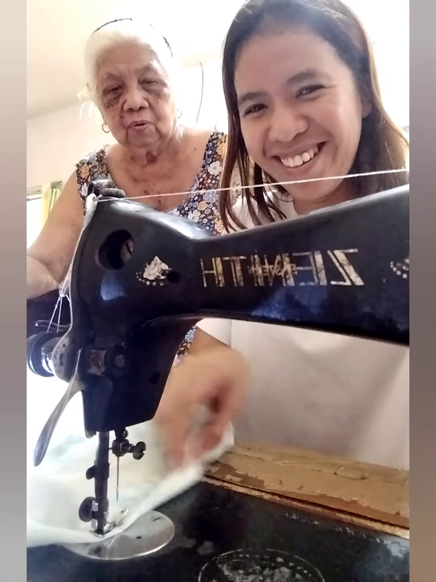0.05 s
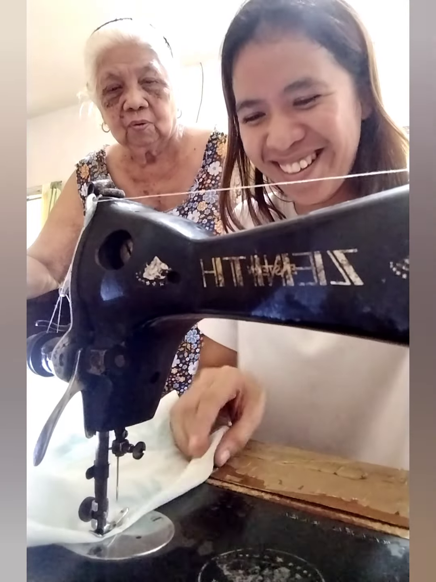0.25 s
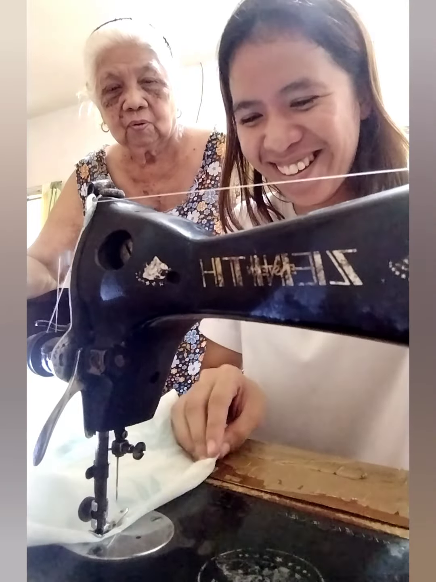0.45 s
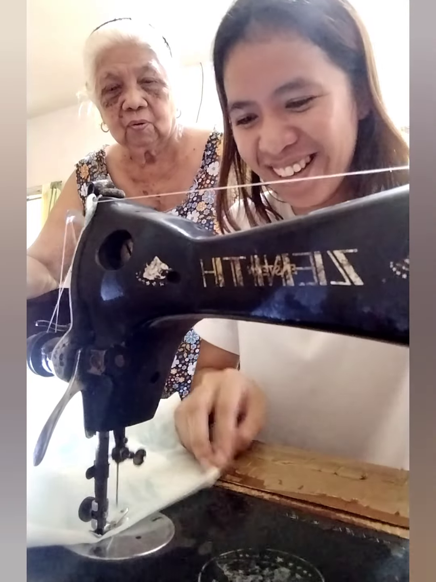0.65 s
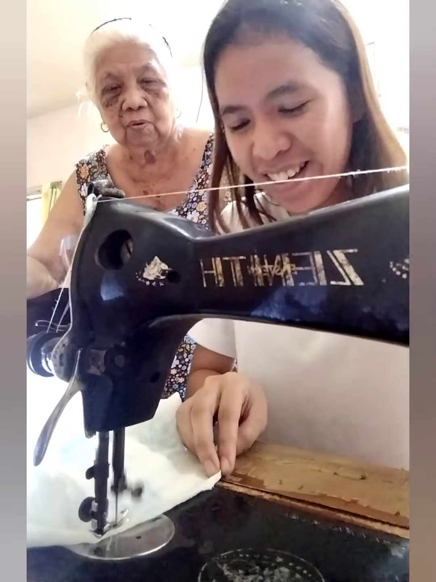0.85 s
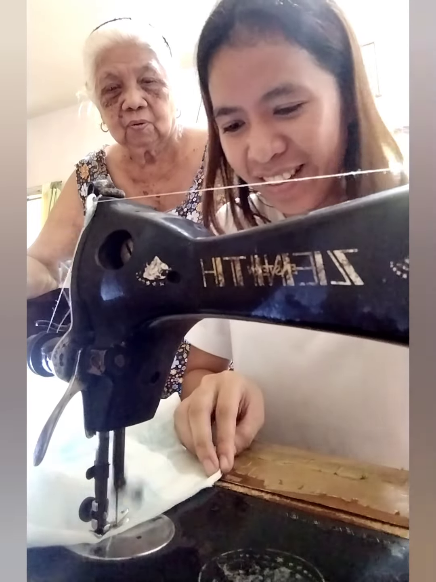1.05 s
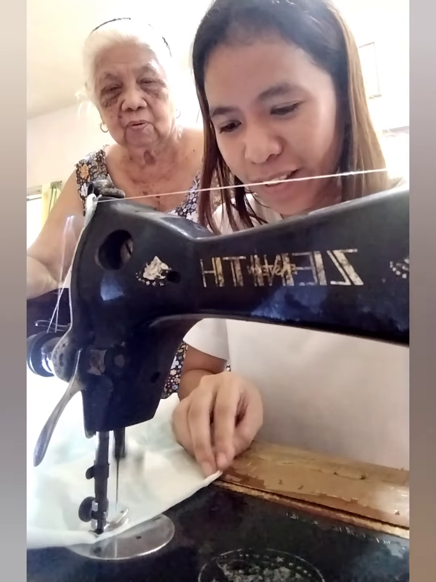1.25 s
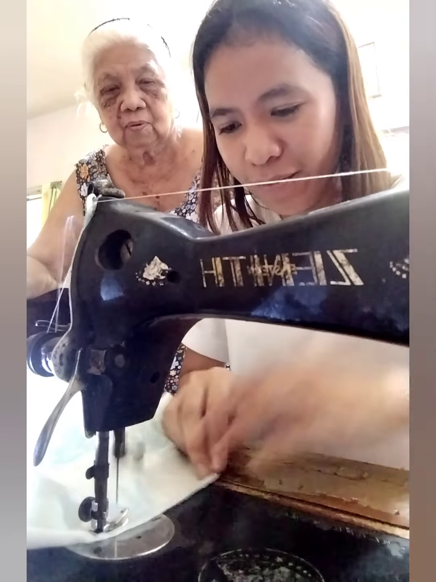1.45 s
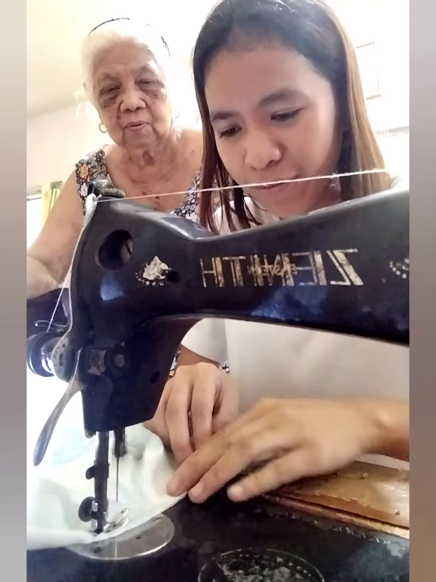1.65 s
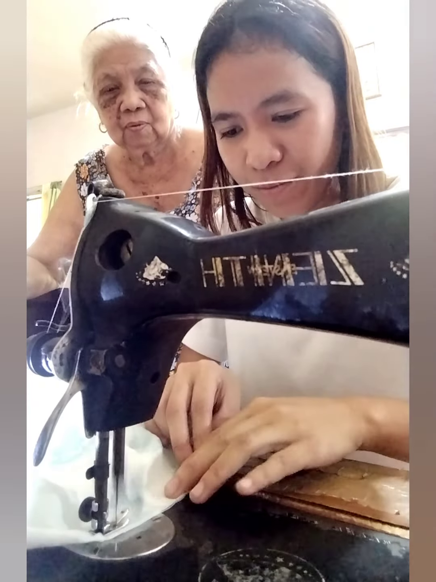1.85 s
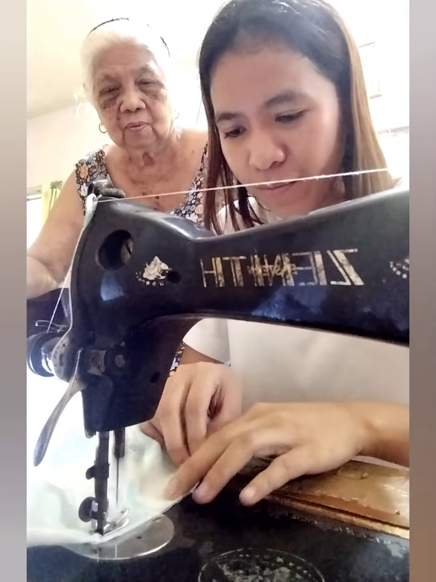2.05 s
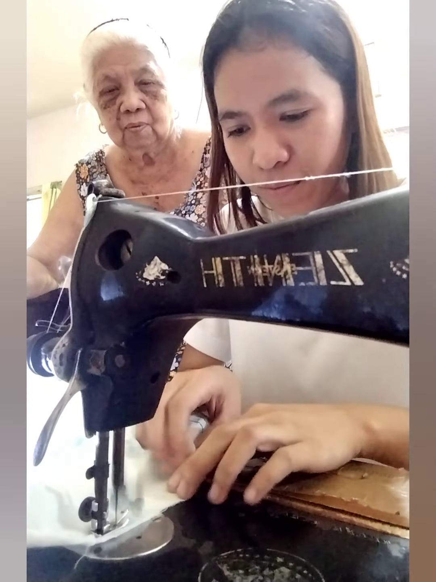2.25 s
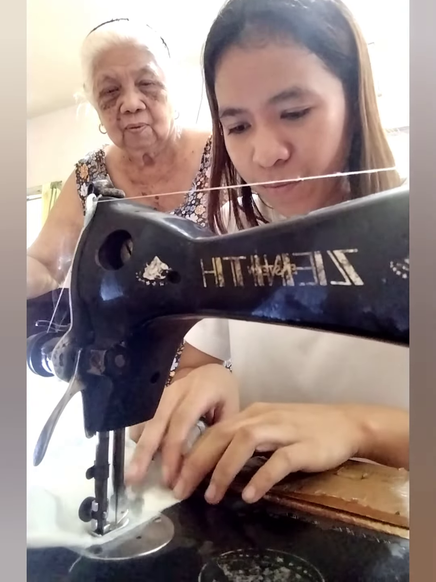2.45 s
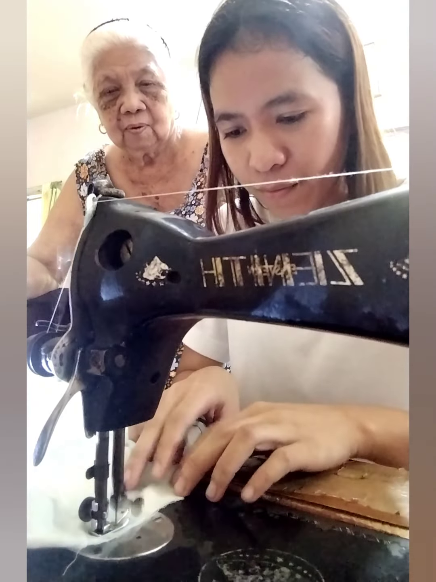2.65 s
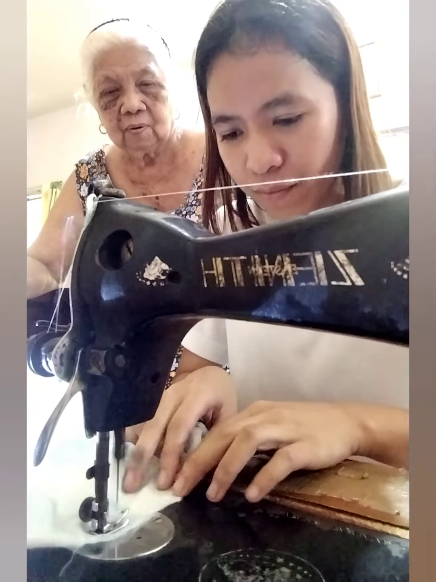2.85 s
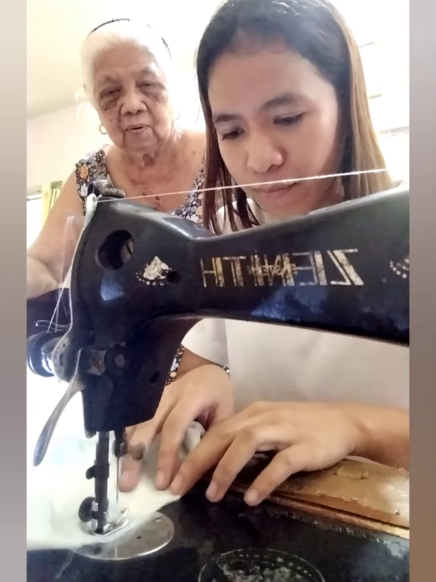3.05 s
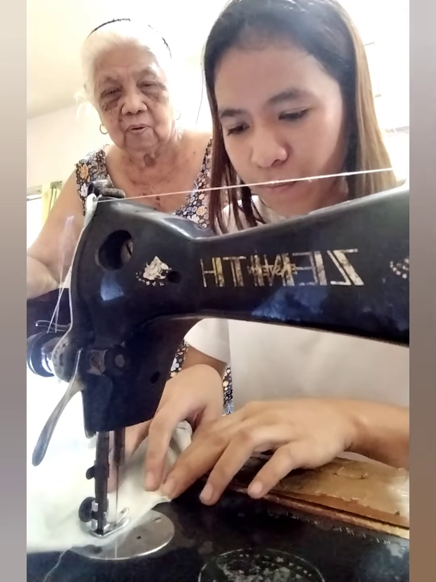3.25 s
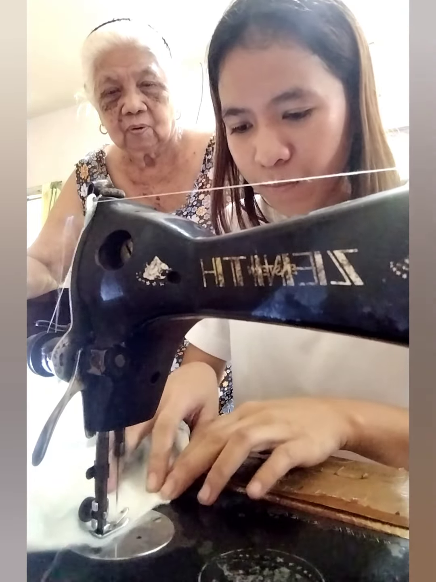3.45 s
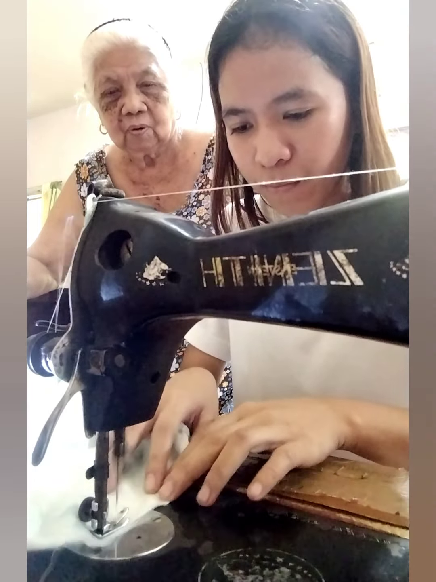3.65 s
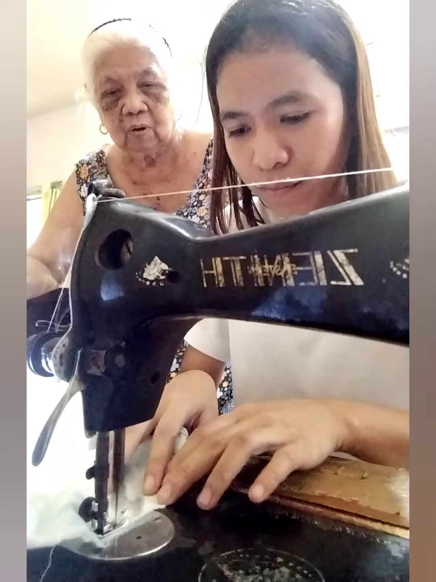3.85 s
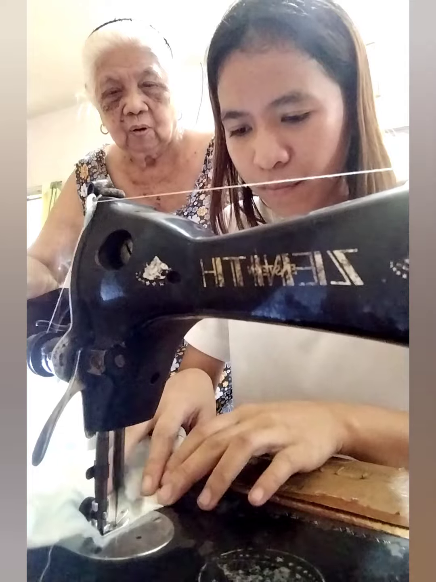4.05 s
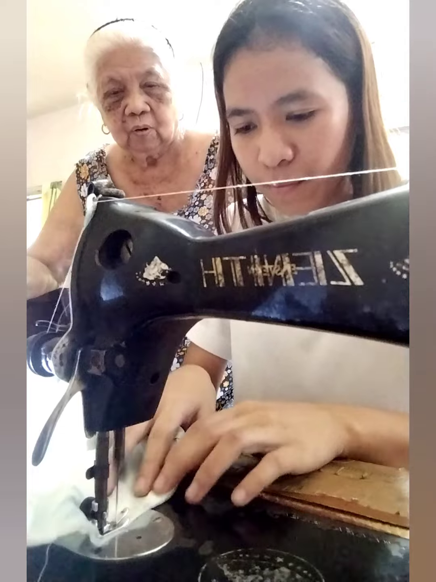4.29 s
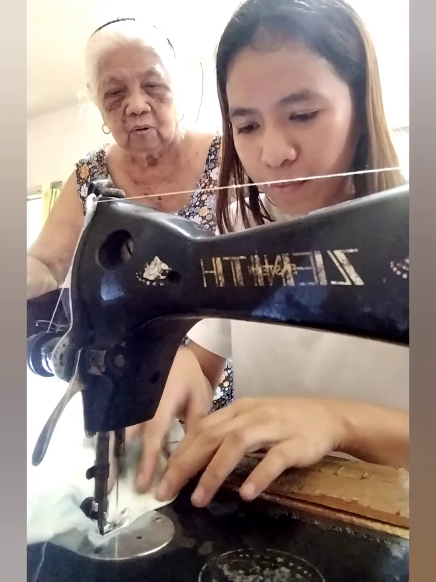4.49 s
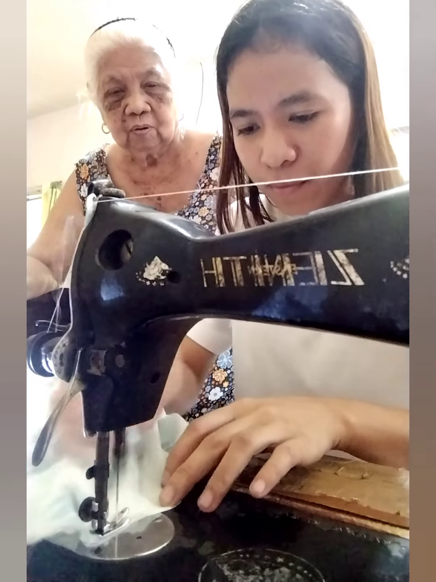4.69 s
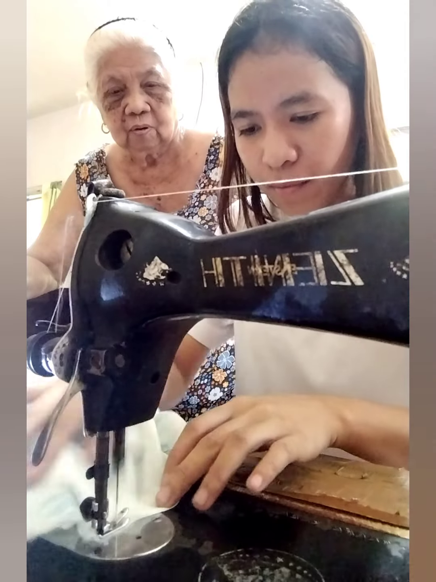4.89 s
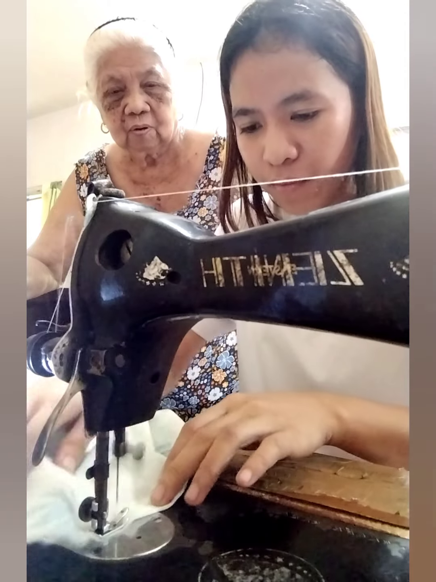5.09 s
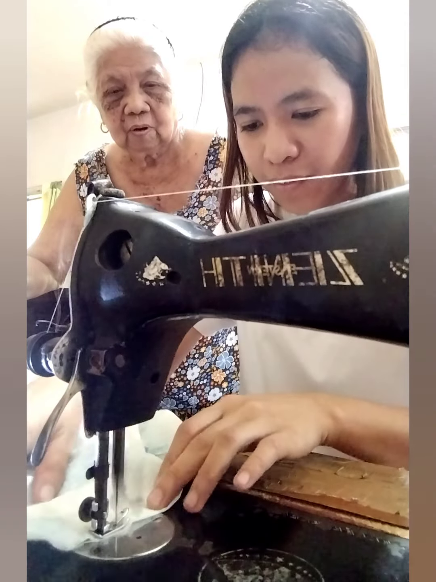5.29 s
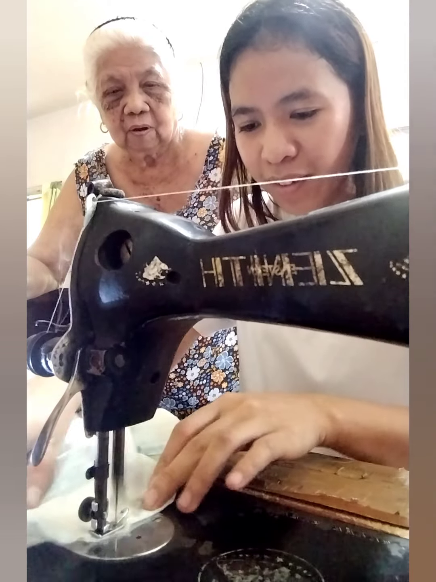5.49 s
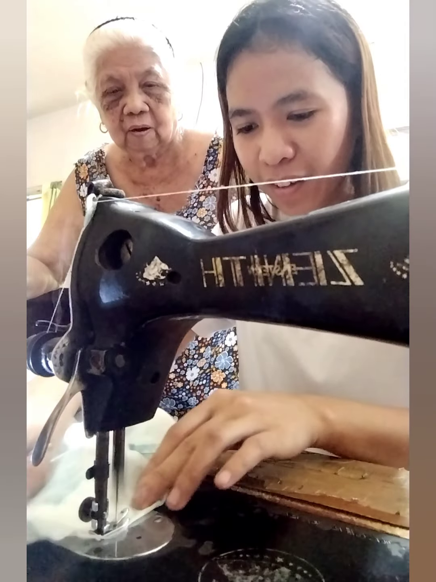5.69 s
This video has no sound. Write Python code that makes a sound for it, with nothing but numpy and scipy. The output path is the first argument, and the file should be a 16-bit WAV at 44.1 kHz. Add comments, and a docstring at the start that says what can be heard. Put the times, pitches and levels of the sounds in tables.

```python
"""Treadle sewing machine

Out of near silence the drive takes up its slack, the belt squeaks and the wheel makes a few uneven turns.
Then the stitching settles in: needle bar, shuttle and feed dog strike in turn, each contact chattering
briefly and ringing the iron head. Bearings and belt whir and the pedal shakes the wooden table,
all close to a phone in a small room."""
import sys
import numpy as np
from scipy import signal
from scipy.fft import rfft, irfft, next_fast_len
from scipy.io import wavfile
from scipy.ndimage import uniform_filter1d, map_coordinates

SR = 44100
rng = np.random.default_rng(int(sys.argv[2]) if len(sys.argv) > 2 else 0)


def generate_wav(sig):
    """Save sig (samples, or channels by samples) to the path in sys.argv[1] as 16-bit PCM at SR."""
    pcm = np.round(np.clip(np.atleast_2d(sig).T, -1, 1) * 32767).astype(np.int16)
    wavfile.write(sys.argv[1], SR, pcm)


N = 252516

# Slow, uneven first turns of the wheel: start_s, head_db, bars_db, ping_db, tick_db
FIRST_TURNS = [(.555, -41, -57, -55, -55), (.571, -41, -52, -54, -59), (.585, -37.5, -42, -41, -40),
               (.5985, -56, -49, -58, -51), (.6915, -51, -62, -66, -50), (.7178, -51, -63, -62, -58),
               (.743, -44, -54, -58, -57), (.7563, -43, -41, -49, -37.5), (.7844, -43, -55, -51, -51),
               (.817, -49, -42, -57, -62), (.8243, -51, -47, -45, -47), (.9217, -57, -44, -65, -61),
               (.9276, -35.5, -50, -64, -57), (.958, -55, -55, -53, -51), (1.0122, -43, -43, -39, -38),
               (1.058, -46, -45, -49, -47), (1.07, -41, -38, -56, -58), (1.1122, -26, -30.5, -30, -33.5),
               (1.1208, -36, -35, -51, -37.5), (1.1576, -43, -43, -45, -38.5),
               (1.1684, -36.5, -37.5, -40, -40), (1.2415, -32.5, -40, -51, -42),
               (1.2816, -31, -38, -48, -38), (1.2929, -23.5, -46, -48, -55), (1.3112, -36, -43, -40, -41),
               (1.3283, -11, -14, -17, -13), (1.3404, -16, -24.5, -36, -36), (1.3613, -21.5, -39, -45, -45),
               (1.4415, -15, -20, -35, -23), (1.4464, -15, -36, -22, -35), (1.473, -25, -43, -27, -33),
               (1.4995, -32, -43, -48, -48), (1.5399, -19.5, -36, -32, -39), (1.5612, -20.5, -34, -29, -35),
               (1.595, -33, -39, -41, -44), (1.627, -35, -38, -42, -38.5)]
# The hard hits of the stitch cycle, one table a part: start_s, head_db, steel_db
NEEDLE_BAR_HITS = [(1.7154, -29.5, -29.5), (1.9495, -26, -26.5), (2.156, -23, -26), (2.3838, -36, -27),
                   (2.593, -29, -27.5), (2.8388, -31, -31), (3.067, -24, -24), (3.26, -24.5, -25),
                   (3.4723, -26.5, -23), (3.6586, -21.5, -22), (3.848, -24, -22), (4.029, -24.5, -24),
                   (4.2065, -19, -22), (4.3938, -23.5, -22), (4.5615, -20, -21.5), (4.7385, -27, -27),
                   (4.9094, -20.5, -21), (5.096, -26, -22), (5.2982, -25.5, -24), (5.4777, -22.5, -22),
                   (5.663, -24, -23)]
SHUTTLE_CATCH_HITS = [(1.751, -33, -49), (1.978, -33, -36), (2.199, -26.5, -31), (2.4125, -44, -42),
                      (2.6428, -28, -46), (2.8772, -33, -45), (3.1098, -24, -24), (3.307, -26, -30),
                      (3.5159, -27.5, -26.5), (3.6972, -23.5, -24), (3.8888, -25, -25.5),
                      (4.0674, -21.5, -23), (4.2467, -22.5, -29), (4.4322, -24, -21), (4.599, -24, -24),
                      (4.7739, -21, -23.5), (4.9463, -24, -20), (5.1409, -25, -26), (5.3405, -23.5, -23.5),
                      (5.5161, -24, -22.5), (5.7047, -25, -23)]
SHUTTLE_RETURN_HITS = [(1.571, -23.5, -23.5), (1.5808, -32, -26), (1.8271, -28, -25.5), (2.0386, -33, -26),
                       (2.0474, -25, -24.5), (2.2413, -24.5, -29), (2.2513, -28, -24.5),
                       (2.477, -24, -25.5), (2.4832, -27, -25.5), (2.6934, -44, -27), (2.7002, -26, -28),
                       (2.9478, -24, -27.5), (2.9527, -35, -26), (3.149, -31, -22.5), (3.1549, -26, -26),
                       (3.3602, -23, -24), (3.556, -21.5, -24.5), (3.5616, -33, -21), (3.7388, -28, -25),
                       (3.7438, -23, -22.5), (3.9295, -21, -21.5), (3.9338, -35, -21.5),
                       (4.1038, -20.5, -24), (4.1091, -21.5, -20), (4.2891, -31, -25), (4.296, -23, -30),
                       (4.469, -28, -20), (4.4746, -21, -21.5), (4.6365, -23, -20), (4.6418, -17.5, -21),
                       (4.8117, -34, -24.5), (4.8185, -21.5, -19), (4.985, -28, -23),
                       (4.9904, -21.5, -22.5), (5.186, -25.5, -27), (5.192, -23, -23),
                       (5.3791, -22.5, -20.5), (5.3836, -40, -23.5), (5.556, -37, -22.5),
                       (5.5602, -19.5, -21.5)]  # a double knock
FEED_DOG_HITS = [(1.6954, -29.5, -30.5), (1.901, -23.5, -29.5), (2.1053, -22, -32), (2.3256, -26, -45),
                 (2.5438, -21, -27.5), (2.7811, -21.5, -33), (3.0204, -21.5, -26), (3.2004, -27, -26),
                 (3.4272, -22, -32), (3.6192, -22.5, -31), (3.989, -26, -31), (4.3556, -27, -26),
                 (4.5233, -21, -28), (4.6954, -20.5, -31), (4.8712, -21.5, -31), (5.2527, -30, -32),
                 (5.5903, -26.5, -34)]
THREAD_LOOP_HITS = [(1.7856, -23, -35), (2.012, -24, -31), (2.2286, -24, -32), (2.4452, -25.5, -38),
                    (2.9163, -22, -38), (3.1392, -47.5, -42), (3.3414, -30, -45), (3.5287, -25.5, -33),
                    (3.7084, -29, -35), (3.902, -35, -42), (4.0781, -34, -31), (4.2603, -27, -31),
                    (4.4424, -26.5, -35), (4.6143, -21.5, -29), (4.7825, -25, -33), (4.9592, -22.5, -35),
                    (5.1577, -26, -46), (5.3534, -29, -44), (5.5457, -32, -35), (5.7177, -25, -31)]
DOG_LIFT_HITS = [(2.083, -41, -35), (2.272, -44, -39), (2.5233, -37, -31), (2.7543, -37, -31),
                 (2.9676, -29, -32), (3.1855, -26, -32), (3.375, -43, -37), (3.5866, -25, -32.5),
                 (3.7682, -28, -30.5), (3.9592, -28.5, -32), (4.1391, -26.5, -33), (4.3063, -26, -31),
                 (4.5066, -41, -33), (4.6741, -31, -32.5), (5.0197, -27, -33), (5.222, -30, -36),
                 (5.5722, -38, -43)]
# Each part's tone, as trims on its steel_db: bars_db, ping_db, tick_db
NEEDLE_TONE, CATCH_TONE, RETURN_TONE = (-.7, -.77, -.3), (-7, .3, -9), (-4, -2.5, .2)
FEED_TONE, LOOP_TONE, LIFT_TONE = (.3, -27, -5.5), (.3, -1, -6), (-.7, -1.8, .3)
# Light hits between needle strokes, relative to the whir: stitch_share, head_db, bars_db, ping_db, tick_db
LIGHT_HITS = [(.39, -8.5, -8, -3, -0.6), (.53, 3, -13, 2, -3), (.95, 3.5, 0.5, 0, -3)]
# Running shafts (whir in the head, sliding hiss, balance wheel hum): time_s, whir_db, hiss_db, hum_db
SHAFT_LEVELS = [(0.0, -80, -77, -85), (0.35, -97, -89, -102), (0.43, -47, -52, -48),
                (0.6, -49.5, -53.5, -50), (0.72, -45, -54.5, -42), (0.9, -50.5, -59, -67),
                (1.07, -46.5, -55, -39), (1.21, -46, -53, -52), (1.34, -34, -35, -18),
                (1.44, -33.5, -37.5, -38), (1.5, -30, -34, -31), (1.75, -39.5, -42.5, -47),
                (1.82, -37, -37.5, -35), (2.35, -34.5, -38, -39), (2.77, -33, -35.5, -34.5),
                (2.88, -38.5, -39, -35), (3.16, -32.5, -35, -40), (3.46, -34, -36, -35),
                (4.23, -33, -36, -33.5), (4.66, -33, -34, -38), (5.26, -34, -36.5, -43),
                (5.5, -32.5, -34, -30.5), (5.73, -34.5, -35.5, -35)]
# Pedal and flywheel thumping the table: start_s, hold_s, top_db, drawers_db
TABLE_THUMPS = [(.24, 0.046, -54, -66.5), (0.442, 0.095, -42, -37.5), (1.132, .02, -60, -45),
                (1.326, 0.011, -27.5, -44), (1.457, .02, -31.5, -51), (1.541, 0.033, -32, -31),
                (1.825, 0.034, -32.5, -48), (2.027, .05, -33.5, -43), (2.326, 0.046, -35.5, -31),
                (2.473, 0.021, -34.5, -42), (2.558, 0.027, -31.5, -29.5), (2.715, 0.013, -36, -33),
                (2.769, 0.023, -32, -24), (2.95, 0.025, -35, -52), (3.114, 0.027, -34, -49),
                (3.186, 0.038, -32, -31), (3.29, .04, -31, -35), (3.418, .02, -62, -38),
                (3.537, 0.018, -38, -43), (3.709, 0.035, -30.5, -33.5), (3.906, 0.024, -39, -54),
                (4.114, .02, -44, -43), (4.216, 0.091, -28.5, -30), (4.45, 0.034, -35, -46),
                (4.58, 0.022, -38, -48), (4.625, 0.03, -50, -37), (4.806, 0.022, -35.5, -54),
                (4.9, .02, -35, -37), (4.986, 0.046, -32.5, -33.5), (5.16, 0.018, -36, -48),
                (5.395, 0.022, -34.5, -42), (5.517, .02, -35.5, -50), (5.577, 0.018, -36, -54)]
# The drive's slack closing with a long ring: start_s, level_db, t60_s
SLACK_CLANK = (0.43, -41.5, 0.22)
# One hollow knock of the pedal: start_s, level_db, modes (pitch_hz, width_hz, gain_db)
PEDAL_KNOCK = (.927, -37, [(526, 25, 0.5), (2900, 120, 6.5)])
# The belt slipping: start_s, level_db, end_pitch_hz
BELT_SQUEAKS = [(0.557, -39, 1720), (0.63, -34.5, 1700), (0.716, -38, 1700)]
# Faint hiss before the start: time_s, bands_db, high_db
FAINT_HISS_LEVELS = [(0.0, -61.5, -77), (0.084, -78, -95), (0.096, -66, -90), (0.104, -76, -94),
                     (0.202, -83, -74), (0.214, -67, -71), (0.23, -73, -65), (0.24, -74, -75),
                     (0.4, -103, -84)]

# The resonances that colour each layer: pitch_hz, width_hz, gain_db
IRON_HEAD_MODES = [(527.4, 55.6, -4.5), (707, 50, -0.5), (930, 143, -1.5), (1206, 77, -3), (1360, 87, -0.5),
                   (1690, 260, -5.5), (2085, 377, -3.5)]
STEEL_BAR_MODES = [(2210, 350, -10), (2686, 173, -1), (2908, 196, -2.5), (3508, 306, 2)]
SHUTTLE_PING_MODES = [(3780, 123, -4), (3958, 187, -3.5), (4260, 300, -10)]
TICK_MODES = [(4940, 830, -2), (5806, 386, 3), (6620, 1140, -1.5), (7710, 620, 0), (8540, 484, 2.5),
              (9980, 960, -5)]
EDGE_MODES = [(11280, 2200, -5), (14000, 870, -5.5), (14500, 1100, -3.5)]  # the keen top of a hit
WHEEL_MODES = [(1288, 53, 1.5), (1378, 65, -3)]
PITMAN_ROD_MODES = [(3760, 110, 7), (7200, 290, -8), (8140, 310, -1.5), (8600, 180, -12)]
TABLE_TOP_MODES = [(164.1, 16.5, 0.0038), (209, 37, 0)]
DRAWER_MODES = [(219, 90, -3.5), (297.5, 20, -2.5), (331, 22.3, -1), (410, 900, -22.5)]
FAINT_HISS_MODES = [(590, 76, -8), (2280, 74, 3), (3500, 58, -3), (3860, 56, 1), (6360, 100, -25),
                    (9050, 100, -14)]
# The small room's decay: frequency_hz, t60_s
ROOM_DECAY = [(300, 0.051), (2000, 0.19), (12000, 0.31)]


def stitch_hits():
    """Each hit rings the heavy iron head and, with a faster attack, the bars, shuttle and a bright tick."""
    start_s, head_db, bars_db, ping_db, tick_db = hit_list().T
    at = np.round(start_s * SR).astype(int)
    head = ring(chatter(at, head_db - 1.5, 0.0014, 0.044, grit_db=2, strike_db=9.5), IRON_HEAD_MODES)
    head += knocks(at, head_db - 3, IRON_HEAD_MODES, scatter_db=2.5)
    wood_db = 1.468 * head_db - 5.5  # only heavy blows reach the table
    wood = knocks(at, wood_db, TABLE_TOP_MODES + DRAWER_MODES, scatter_db=1.5)
    wheel = ring(chatter(at, head_db - 8, 0.0025, 0.077, grit_db=1.5, strike_db=3), WHEEL_MODES)
    bars = ring(chatter(at, bars_db + 0.5, 0.0011, 0.037, grit_db=-1.5, strike_db=15), STEEL_BAR_MODES)
    bars += knocks(at, bars_db + 0.5, STEEL_BAR_MODES, scatter_db=-1.5)
    ping = ring(chatter(at, ping_db - 4.5, 0.0007, 0.026, grit_db=0.5, strike_db=18), SHUTTLE_PING_MODES)
    ping += knocks(at, ping_db + 5, SHUTTLE_PING_MODES, scatter_db=1.5)
    tick = ring(chatter(at, tick_db + 1, 0.00029, 0.031, grit_db=2, strike_db=3.5), TICK_MODES)
    # light, hard contacts have the keenest edge; heavy blows on the head are blunt
    edge_db = tick_db - 9.5 + 0.41 * (tick_db - head_db) - 1.7 * np.clip(head_db + 18, 0, None)
    edge = ring(chatter(at, edge_db, 0.00019, 0.03, grit_db=0.5, strike_db=1.5), EDGE_MODES)
    return head + wood + wheel + bars + ping + tick + edge


def hit_list():
    """The cue sheet of first turns, hard and light hits: start_s, head_db, bars_db, ping_db, tick_db."""
    parts = [(NEEDLE_BAR_HITS, NEEDLE_TONE), (SHUTTLE_CATCH_HITS, CATCH_TONE),
             (SHUTTLE_RETURN_HITS, RETURN_TONE), (FEED_DOG_HITS, FEED_TONE),
             (THREAD_LOOP_HITS, LOOP_TONE), (DOG_LIFT_HITS, LIFT_TONE)]
    hard = [(start_s, head_db, *np.add(steel_db, tone_db))
            for hits, tone_db in parts for start_s, head_db, steel_db in hits]
    needle_s = np.array(NEEDLE_BAR_HITS)[:, 0]
    whir_db = curves(SHAFT_LEVELS)[0]
    light = np.array([(start + share * (end - start), *np.add(whir_db[round(start * SR)], over_db))
                      for start, end in zip(needle_s, needle_s[1:]) for share, *over_db in LIGHT_HITS])
    light += rng.standard_normal(light.shape) * [.004, 2.5, 2.5, 2.5, 2.5]  # loosen time (s), levels (dB)
    return np.vstack([FIRST_TURNS, hard, light])


def loose_parts(count=860):
    """Play in the linkage: small knocks at random times ring the head and the steel."""
    whir_db, hiss_db, _ = shaft_levels()
    when, size = rng.random((count, 2)).T
    at = (when * N).astype(int)
    size_db = -3.5 * np.log(size + 0.11)
    head = knocks(at, whir_db[at] + size_db - 5.5, IRON_HEAD_MODES, scatter_db=3.5)
    steel = knocks(at, hiss_db[at] + size_db - 7, STEEL_BAR_MODES + SHUTTLE_PING_MODES, scatter_db=4.5)
    return head + steel


def shaft_whir():
    """Countless tiny taps of loose parts blur into whir and hiss; the balance wheel hums in its narrow ring."""
    whir_db, hiss_db, hum_db = shaft_levels()
    rattle_db = 1.9 * wobble(70) + 2.2 * wobble(250)

    def taps(modes, grit_db):
        return ring(unit_rms(amp(rattle_db + grit_db * wobble(900)) * rng.standard_normal(N)), modes)

    hiss = amp(-18) * taps(EDGE_MODES, grit_db=1.5)
    hiss += amp(-5) * taps(TICK_MODES, grit_db=2)
    hiss += amp(-1) * taps(STEEL_BAR_MODES + SHUTTLE_PING_MODES, grit_db=4.5)
    hum = amp(hum_db - 11 + 3 * wobble(25)) * taps(WHEEL_MODES, grit_db=0)
    whir = amp(whir_db - 6) * taps(IRON_HEAD_MODES, grit_db=2)
    return whir + amp(hiss_db - 5.5) * hiss + hum


def shaft_levels(swing_db=1.5, peak_share=0.44):
    """Whir, hiss and hum levels in dB, swelling as the shafts load up once a stitch."""
    needle_s = np.array(NEEDLE_BAR_HITS)[:, 0]
    stitch = np.interp(np.arange(N) / SR, needle_s, np.arange(len(needle_s)))
    swell_db = swing_db * (np.cos(2 * np.pi * (stitch - peak_share)) - np.cos(2 * np.pi * peak_share))
    return [level_db + swell_db for level_db in curves(SHAFT_LEVELS)]


def table_boom(rise_db_per_s=700, fade_db_per_s=258):
    """The wood booms in lumps: each thump swells, holds and fades over a steady shake, and jars the head."""
    t = np.arange(0, N, 64) / SR
    whir_db = curves(SHAFT_LEVELS)[0]
    start_s, hold_s, top_db, drawers_db = np.transpose(TABLE_THUMPS)
    age_s = t - start_s[:, None]
    fading_s = np.clip(age_s - hold_s[:, None], 0, None)
    shape_db = np.where(age_s < 0, rise_db_per_s * age_s, -fade_db_per_s * fading_s)
    lumps = amp(2.2 * wobble(50))
    bodies = [(TABLE_TOP_MODES, top_db, -10), (DRAWER_MODES, drawers_db, -8),
              (IRON_HEAD_MODES, drawers_db - 9, -15)]
    out = 0
    for modes, peak_db, shake_db in bodies:
        thump_power = (amp(peak_db[:, None] + shape_db) ** 2).sum(axis=0)
        power = np.interp(np.arange(N) / SR, t, thump_power) + amp(whir_db + shake_db) ** 2
        boom = even_out(ring(lumps * rng.standard_normal(N), modes), span_s=0.063)
        out += amp(-4) * np.sqrt(power) * boom
    return out


def slack_clank():
    """The drive takes up its slack and sets the pitman rod, head and bars ringing."""
    start_s, level_db, t60_s = SLACK_CLANK
    at = [round(start_s * SR)]
    bodies = [(PITMAN_ROD_MODES, level_db, t60_s), (IRON_HEAD_MODES, level_db, t60_s),
              (STEEL_BAR_MODES, level_db + 1.5, 0.43 * t60_s)]
    return sum(ring(chatter(at, np.array([db]), 0.0018, decay_s, grit_db=0.5, strike_db=-3), modes)
               for modes, db, decay_s in bodies)


def pedal_knock():
    """The pedal gives one hollow knock."""
    start_s, level_db, modes = PEDAL_KNOCK
    return knocks(np.array([round(start_s * SR)]), level_db, modes, scatter_db=-1)


def belt_squeaks(glide_s=0.0026, attack_s=0.0022, t60_s=0.073):
    """The belt slips; each squeak drops quickly onto its pitch."""
    t, out = np.arange(SR // 16) / SR, np.zeros(N)
    for start_s, level_db, end_pitch_hz in BELT_SQUEAKS:
        pitch_hz = end_pitch_hz * (1 + 0.14 * np.exp(-t / glide_s) + .03 * rng.standard_normal(len(t)))
        envelope = amp(level_db - 60 * t / t60_s) * (1 - np.exp(-t / attack_s))
        out[round(start_s * SR):][:len(t)] += envelope * np.sin(2 * np.pi * np.cumsum(pitch_hz) / SR)
    return out


def case_rumble():
    """A trace of deep, lumpy rumble reaches the microphone through the phone's case."""
    whir_db = curves(SHAFT_LEVELS)[0]
    lumps = amp(0.87 * whir_db - 21 + 4 * wobble(30)) * rng.standard_normal(N)
    return filtered(lumps, lambda hz: (1 + (hz / 65) ** 2) / (1 + (hz / 130) ** 8))


def faint_hiss():
    """Before the start, a thin hiss flickers in a few narrow bands, with a softer one high up."""
    bands_db, high_db = curves(FAINT_HISS_LEVELS + [(.45, -110, -110)])
    bands = amp(bands_db) * ring(amp(1.7 * wobble(50)) * rng.standard_normal(N), FAINT_HISS_MODES)
    return bands + amp(high_db + 0.5) * ring(rng.standard_normal(N), TICK_MODES + EDGE_MODES)


def room_reverb(x):
    """A short, bright room tail: each frequency dies at its own speed."""
    hz, t, spectrum = signal.stft(rng.standard_normal(SR // 3), SR, nperseg=256)
    band_hz, band_t60_s = np.transpose(ROOM_DECAY)
    t60_s = np.interp(np.log(hz + 1), np.log(band_hz), band_t60_s)
    tail = signal.istft(spectrum * amp(-60 * t / t60_s[:, None]), SR, nperseg=256)[1]
    return signal.fftconvolve(np.pad(x, (200, 0)), tail / np.linalg.norm(tail))[:N]


def chatter(at, db, attack_s, t60_s, grit_db, strike_db):
    """A sharp strike at each sample in at, then a gritty noise tail; overlapping tails add in power."""
    t = np.arange(SR // 3) / SR
    envelope = (1 - np.exp(-t / attack_s)) * amp(-60 * t / t60_s)
    power = signal.fftconvolve(np.bincount(at, amp(db) ** 2, N), envelope ** 2)[:N]
    strikes = np.bincount(at, amp(db + strike_db), N)
    grit = unit_rms(amp(grit_db * wobble(1500)) * rng.standard_normal(N))
    return strikes + np.sqrt(np.abs(power)) * grit


def knocks(at, db, modes, scatter_db, attack_s=0.00058):
    """Clean strikes: each one sets every mode ringing at a new strength and sign."""
    t, out = np.arange(SR // 8) / SR, np.zeros(N)
    draws = rng.standard_normal((len(at), len(modes)))
    for (pitch_hz, width_hz, gain_db), draw in zip(modes, draws.T):
        strength_db = db + gain_db + scatter_db * (2 * np.clip(np.abs(draw), 0, 1.5) - 2.5)
        strikes = np.bincount(at, np.sign(draw) * amp(strength_db), N)
        envelope = (1 - np.exp(-t / attack_s)) * np.exp(-np.pi * width_hz * t)
        out += signal.fftconvolve(strikes, envelope * np.sin(2 * np.pi * pitch_hz * t))[:N]
    return out


def ring(x, modes):
    """x through a resonator bank with steep skirts; white noise keeps its level."""
    low_hz, high_hz = .7 * modes[0][0], 1.25 * modes[-1][0]

    def response(hz):
        s = 1j * hz
        peaks = sum((-1) ** k * amp(db) * s * width / (pitch ** 2 + s * width + s ** 2 + 1e-9)
                    for k, (pitch, width, db) in enumerate(modes))
        low_cut = (s / low_hz) ** 2 / (1 + 1.1 * s / low_hz + (s / low_hz) ** 2)
        high_cut = 1 / (1 + 1.1 * s / high_hz + (s / high_hz) ** 2) ** 2
        gain = peaks * low_cut * high_cut
        return gain / np.sqrt(np.mean(np.abs(gain) ** 2))
    return filtered(x, response)


def filtered(x, response):
    """x shaped by a complex response of frequency in Hz."""
    size = next_fast_len(N + SR // 2)
    return irfft(rfft(x, size) * response(np.fft.rfftfreq(size, 1 / SR)), size)[:N]


def curves(rows):
    """One automation curve for each column after the time."""
    time_s, *columns = np.transpose(rows)
    return [np.interp(np.arange(N) / SR, time_s, column) for column in columns]


def wobble(rate_hz):
    """A smooth random curve, rate_hz knots a second."""
    return map_coordinates(rng.standard_normal(int(N * rate_hz / SR) + 4), [np.arange(N) * rate_hz / SR])


def even_out(x, span_s):
    """x with its level ridden flat over span_s."""
    return x / np.sqrt(np.abs(uniform_filter1d(x ** 2, round(span_s * SR))) + 1e-12)


def unit_rms(x):
    return x / np.sqrt(np.mean(x ** 2) + 1e-20)


def amp(db):
    return 10 ** (np.asarray(db) / 20)


def scene():
    """The mono mix: hits and squeaks feed the room; whir, boom and hiss stay dry."""
    hits = stitch_hits() + loose_parts() + slack_clank() + pedal_knock() + belt_squeaks()
    return (hits + amp(-11) * room_reverb(hits) + shaft_whir() + table_boom() + faint_hiss())[None]


def record(dry):
    """The phone cuts the bass steeply, picks up case rumble, rounds off peaks and drops the very top."""
    low_cut_hz, high_cut_hz, ceiling = 147, 15700, .85
    bass_cut = signal.butter(8, low_cut_hz, "high", fs=SR, output="sos")
    x = signal.sosfilt(bass_cut, dry[0]) + case_rumble()
    x = x / (1 + np.abs(x / ceiling) ** 4) ** (1 / 4)
    return filtered(x, lambda hz: 1 / (1 + (hz / high_cut_hz) ** 120))[None]


dry = scene()
out = record(dry)
generate_wav(out)
```